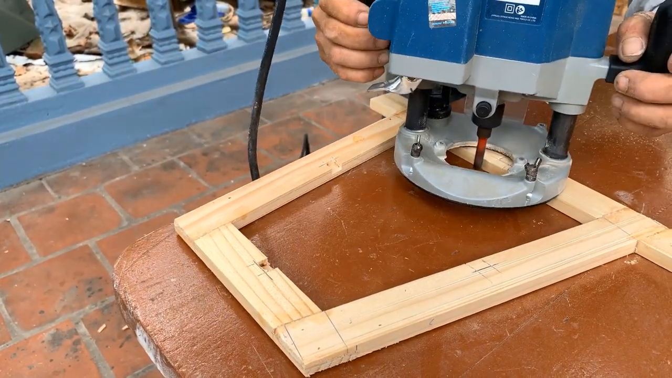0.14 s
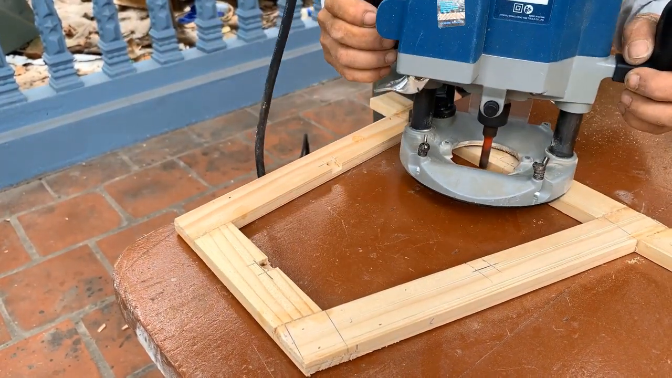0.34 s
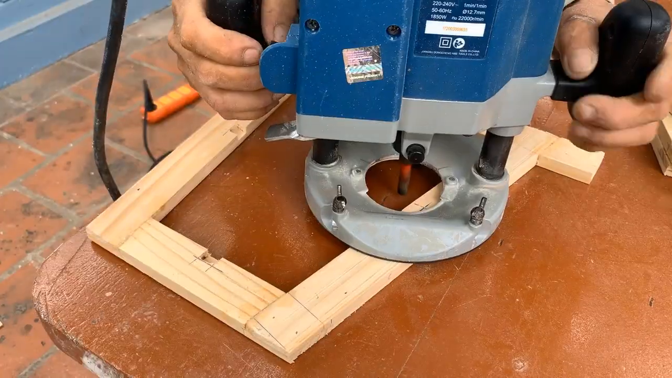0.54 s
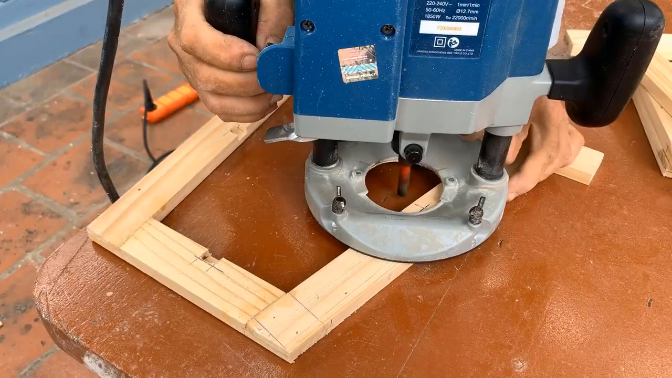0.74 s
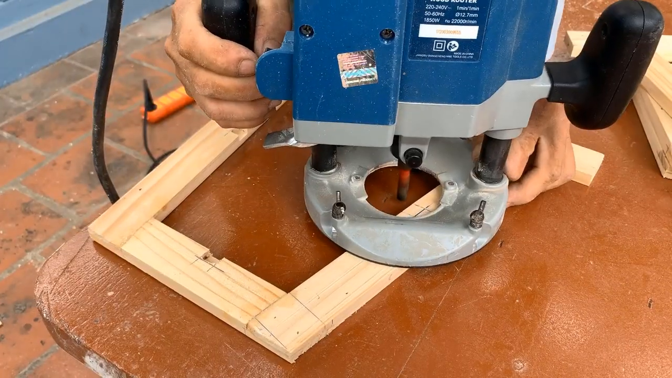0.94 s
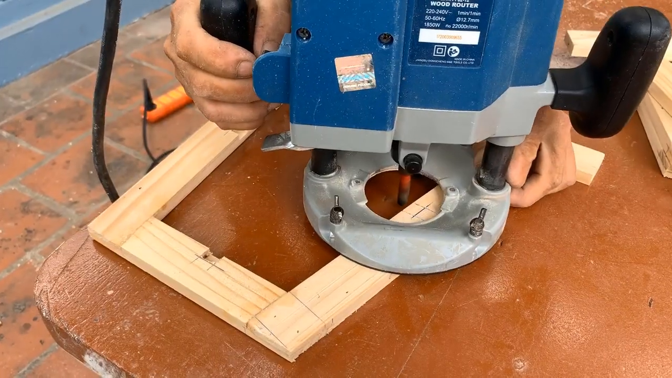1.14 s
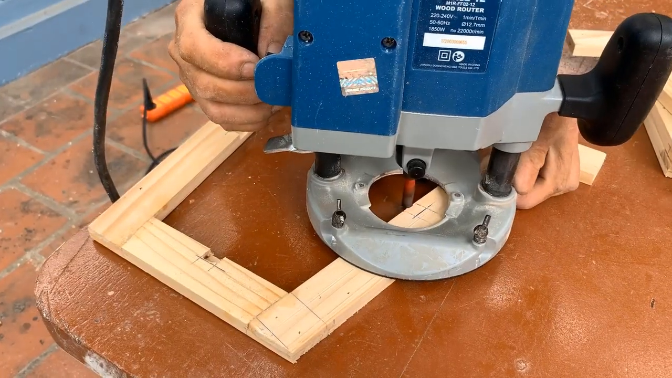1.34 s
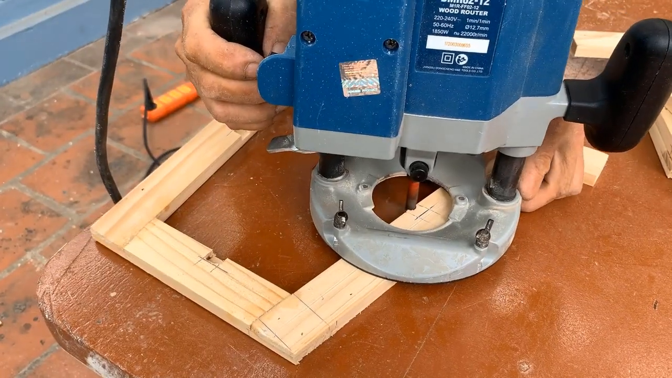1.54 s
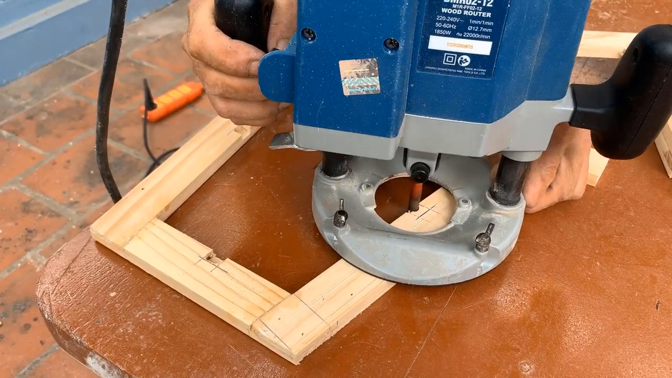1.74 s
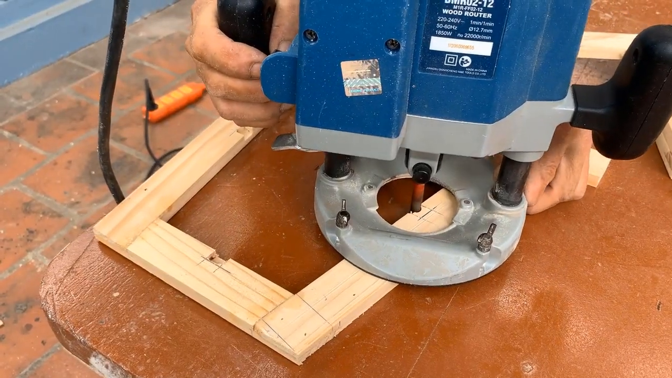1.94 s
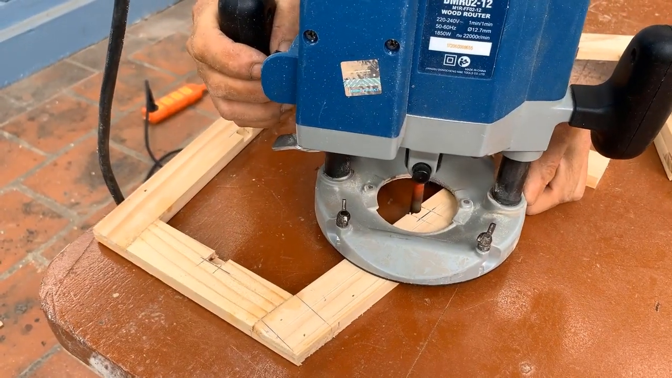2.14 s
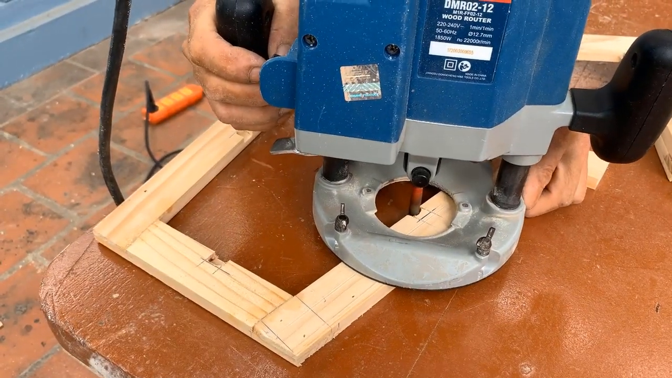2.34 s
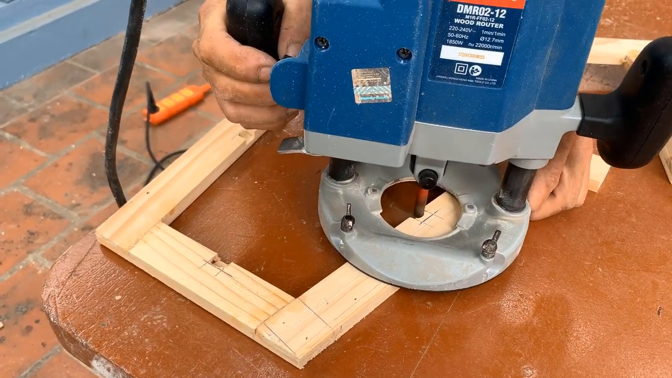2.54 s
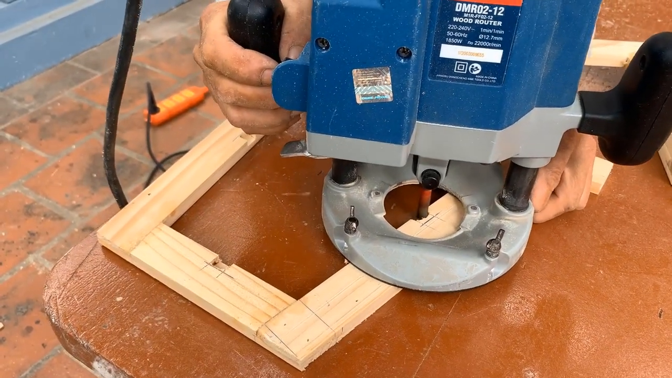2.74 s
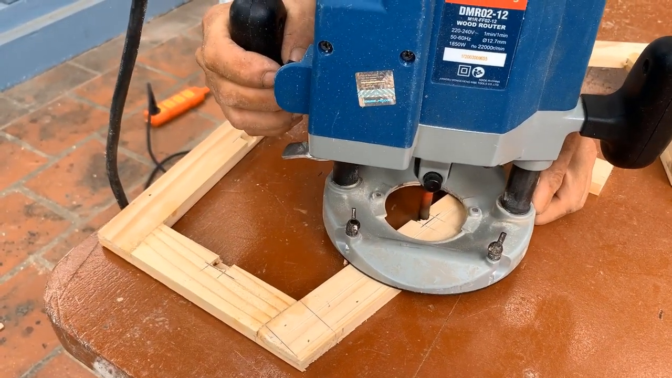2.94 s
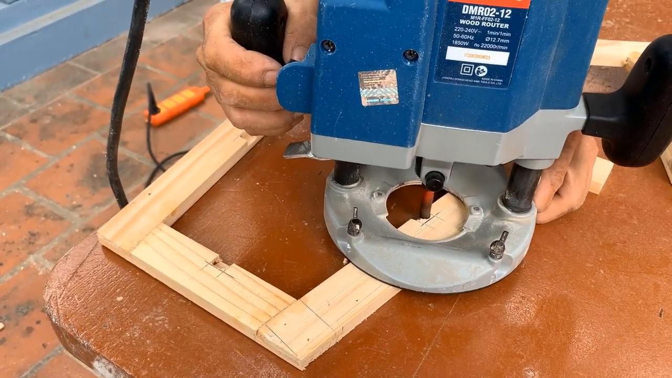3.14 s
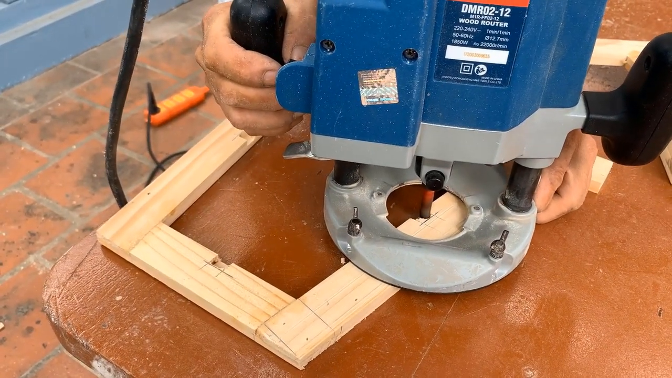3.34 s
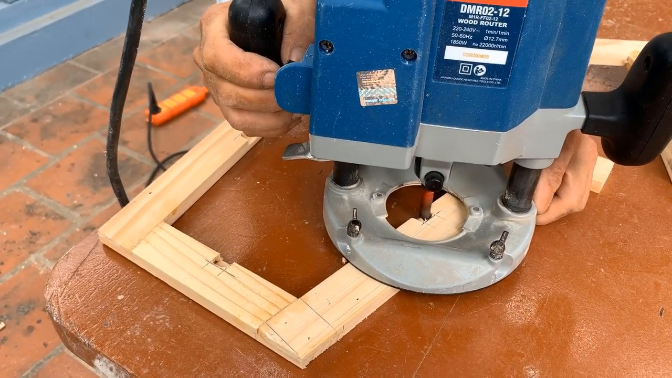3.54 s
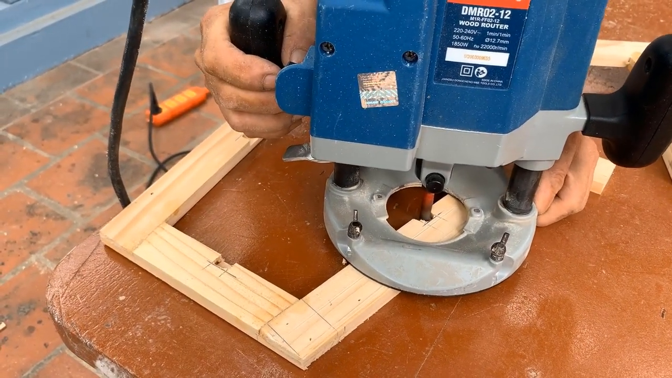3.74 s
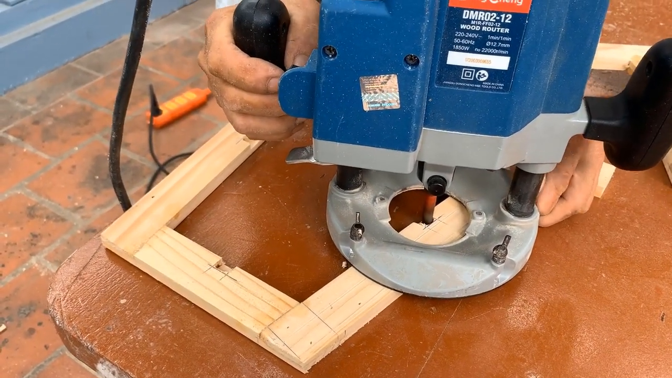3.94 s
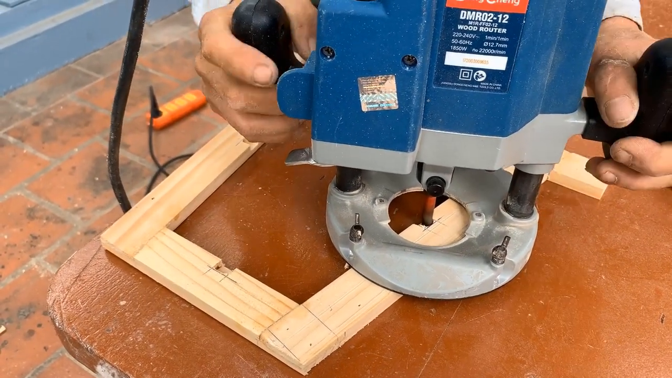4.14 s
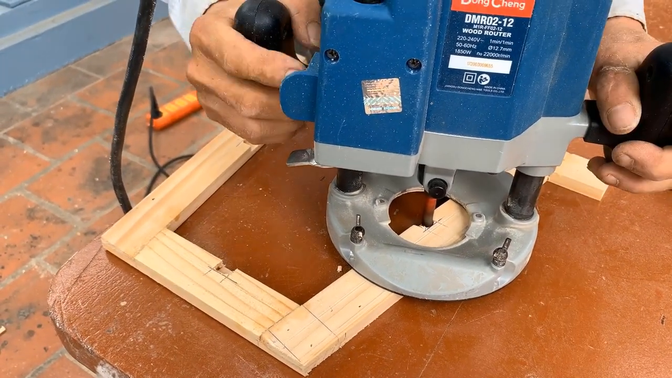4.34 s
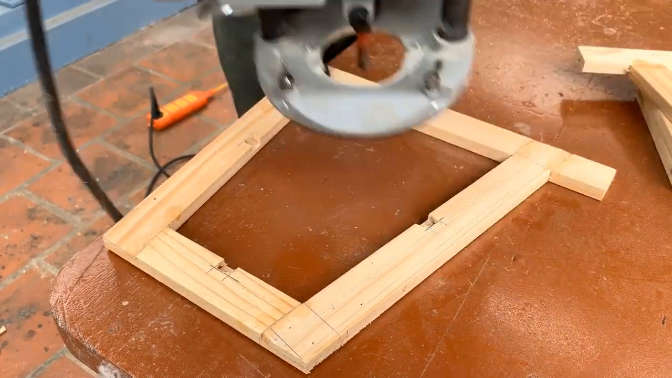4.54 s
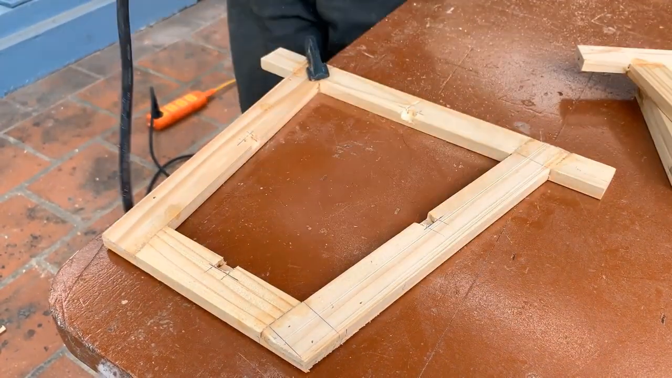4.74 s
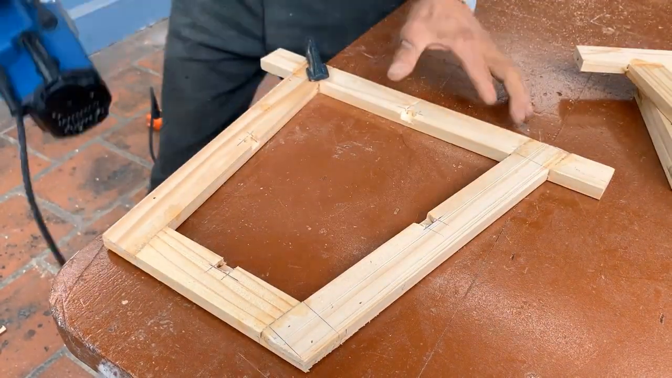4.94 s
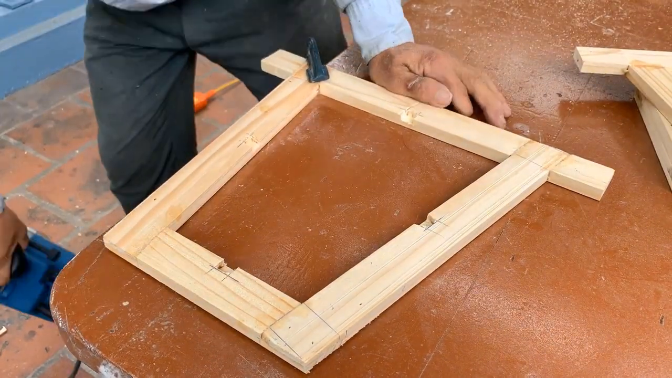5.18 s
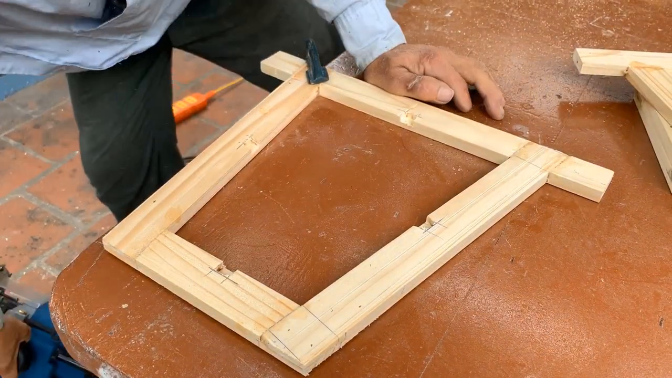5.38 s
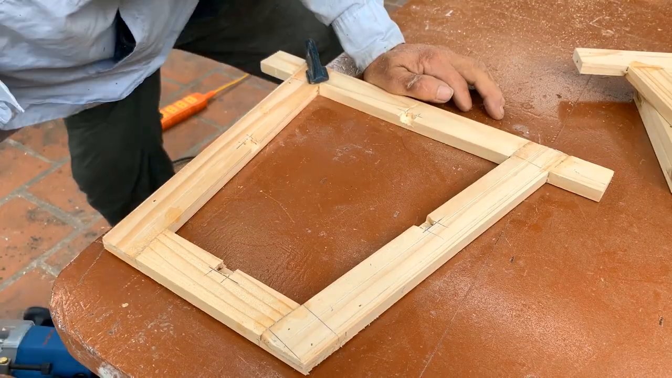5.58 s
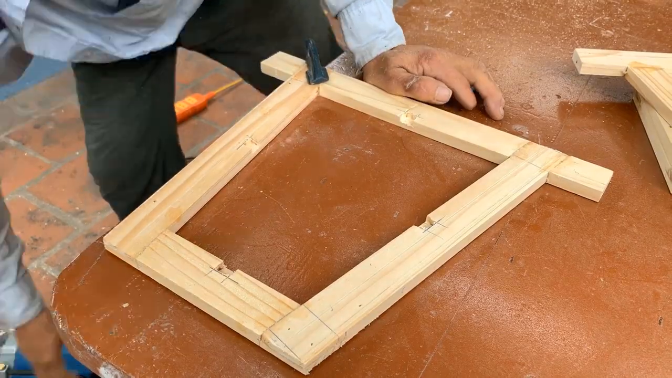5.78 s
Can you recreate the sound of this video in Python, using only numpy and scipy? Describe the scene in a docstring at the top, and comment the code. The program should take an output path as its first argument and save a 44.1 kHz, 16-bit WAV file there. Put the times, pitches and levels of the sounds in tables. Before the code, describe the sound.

A plunge router is already running at full speed, heard close in a quiet yard: a steady high motor whine around 900 Hz with overtones, inside a broad, bright rush of fan air. At about 0.53 s the whole sound drops out for a blink as the tool is seated, then resumes slightly lower and fuller. From 1.4 s the bit meets softwood: piercing, buzzy squeals come in short uneven pushes, the pitch sagging slightly under load, with the sharpest shriek near 2.7 s and lighter rubbing afterwards. Cutting ends just after 4 s, leaving free whine. At 4.4 s it is switched off and lifted; a hissing gust peaks near 4.65 s while whine and air slide down and fade. A thin, falling whistle remains around 5 s. Two soft, low bumps at 5.47 and 5.56 s and a brighter woody knock at 5.73 s set it down over faint outdoor hush.

```python
"""A plunge router held at full speed whines over the rush of its cooling fan; the whole sound drops out
briefly, then it runs seated on the wood. Pushed into a softwood frame to cut a notch, its two-flute bit squeals
in overtones locked to the spindle. Switched off, it is lifted away: exhaust gusts over the notch and the tones
fall as drag and friction slow it. A thin falling whistle is left, then two bumps and a knock of ringing modes
set it down in a quiet yard."""
import sys
import numpy as np
from scipy import signal
from scipy.fft import rfft, irfft, next_fast_len
from scipy.io import wavfile
from scipy.ndimage import uniform_filter1d, map_coordinates

SR = 44100
rng = np.random.default_rng(int(sys.argv[2]) if len(sys.argv) > 2 else 0)


def bounce(signal):
    """Save signal as a 16-bit WAV file at the path given by the first command-line argument."""
    frames = np.transpose(np.atleast_2d(signal))
    limited = np.clip(frames, -1, 1)
    pcm = np.round(limited * 32767).astype(np.int16)
    wavfile.write(sys.argv[1], SR, pcm)


N = 256215
TOUCH_S, CLEAR_S = 1.4, 4.07  # the bit starts to touch the wood, and starts to let go


def amp(db):
    """Decibels to linear gain."""
    return 10 ** (np.asarray(db) / 20)


def unit(x):
    """Scale to an rms of 1."""
    return x / np.sqrt(np.mean(x ** 2) + 1e-20)


def along(points, hz):
    """Read (frequency [Hz], value) points on a log frequency axis."""
    f, v = np.transpose(points)
    return np.interp(np.log(hz + 1), np.log(f + 1), v)


def curves(rows):
    """One value per sample for each column after the time."""
    s, *cols = np.transpose(rows)
    return [np.interp(np.arange(N) / SR, s, c) for c in cols]


def wobble(rate):
    """A smooth random curve with rate knots a second."""
    knots = rng.standard_normal(int(N * rate / SR) + 4)
    return map_coordinates(knots, [np.arange(N) * rate / SR])


def filtered(x, response):
    """Shape the spectrum of x by a response of frequency."""
    m = next_fast_len(N + SR // 4)
    return irfft(rfft(x, m) * response(np.fft.rfftfreq(m, 1 / SR)), m)[..., :N]


def swells(resonances, hz):
    """Gain in dB at a frequency from (centre [Hz], width [Hz], gain [dB]) resonances."""
    return sum(db / (1 + (2 * (hz - centre) / width) ** 2) for centre, width, db in resonances)


def rush(spectrum, resonances=(), patchy_db=1):
    """Turbulent stereo noise of rms 1, with patches of random gain in time and frequency."""
    # likeness of left and right: (frequency [Hz], correlation [0-1])
    likeness = [(150, .992), (300, .968), (650, .92), (1400, .66), (2500, .85), (5000, .36), (8000, .33),
                (14000, .42)]
    z = signal.stft(rng.standard_normal((2, N)), nperseg=512)[2]
    field = uniform_filter1d(rng.standard_normal(z.shape[1:]), size=5, axis=0)
    field = uniform_filter1d(field, size=14, axis=1)
    pair = signal.istft(z * amp(patchy_db * unit(field)), nperseg=512)[1][:, :N]

    def mid_side(hz):
        turn = np.arccos(np.clip(along(likeness, hz), 0, 1)) / 2
        colour = amp(along(spectrum, hz) + swells(resonances, hz))
        return colour * [np.cos(turn), np.sin(turn)]

    mid, side = filtered(pair, mid_side)
    return unit(np.array([mid + side, mid - side]))


def tone(turns, db, order, flutter_db, lead=0, blur=0.11):
    """A sine at order times the spindle rate, with fluttering level, blurred phase and a drifting stereo lead."""
    phase = 2 * np.pi * order * turns + blur * wobble(120)
    # the left channel runs ahead by about lead radians
    sides = np.array([[.5], [-.5]]) * (lead + 0.27 * wobble(4.86))
    flutter = amp(flutter_db * (.8 * wobble(45) + .6 * wobble(14)))
    audible = order * np.gradient(turns) < .5  # mute anything above half the sample rate
    return amp(db) * audible * unit(flutter * np.sin(phase + sides))


def gate(start, end):
    """Grip, hold and release of a contact between bit and wood."""
    grip_s, release_s = 0.009, 0.042
    t = np.arange(N) / SR
    return np.clip((t - start) / grip_s, 0, 1) * np.clip(1 - (t - end) / release_s, 0, 1)


def whereabouts():
    """Shares of the three places: held above the work, seated on it, carried away."""
    # where the machine is: (time [s], seated [0-1], carried away [0-1])
    place = [(.51, 0.08, 0), (.54, 0.97, 0), (4.42, 1, 0), (4.62, 0.8, 0.07), (4.78, 0.42, 0.58),
             (4.97, 0, 0.9), (5.1, 0, 1)]
    seated, away = np.clip(curves(place), 0, 1)
    shares = np.array([np.clip(1 - seated - away, 0, 1), seated, away])
    return shares / shares.sum(axis=0)


def spindle():
    """Turns per second: driven until the switch-off, then braked by air drag and bearing friction."""
    # speed under power, sagging under load: (time [s], speed [turns/s])
    powered = [(0.0, 443.8), (0.5, 444.2), (0.55, 441.1), (1.3, 440.9), (1.42, 441.7), (1.6, 438.0),
               (1.8, 431.2), (1.9, 430.1), (2.3, 433.6), (2.6, 437.2), (2.7, 433.3), (2.8, 431.8),
               (3.0, 432.9), (3.3, 431.0), (3.6, 431.5), (3.8, 433.5), (4.05, 438.5), (4.42, 441.7)]
    off_s, air_drag, friction = 4.424, .00091, 59  # s, per turn, turns/s lost each second
    driven, = curves(powered)
    coast_s = np.maximum(np.arange(N) / SR - off_s, 0)
    even = np.sqrt(friction / air_drag)  # the speed at which both brake equally
    return even * np.tan(np.arctan(driven / even) - air_drag * even * coast_s)


def yard():
    """The quiet yard: a faint bed of patchy, mostly low noise."""
    # colour of the yard: (frequency [Hz], relative density [dB])
    yard_colour = [(30, -35), (70, -9), (150, 3), (300, -4.5), (800, -4), (4000, -22), (15000, -25)]
    return amp(-78.5) * rush(yard_colour, patchy_db=4.0)


def knocks():
    """Each set-down contact is a short noise clack ringing the same modes; soft ones keep only the low end."""
    # contacts: (time [s], gain [dB], upper band edge [Hz])
    contacts = [(5.467, -58.5, 504), (5.564, -55, 472), (5.732, -50.5, 2500)]
    # ringing modes: (frequency [Hz], relative level [dB], t60 [s])
    modes = [(166, -7, 0.14), (243.7, -7, 0.071), (311.7, -8, 0.14), (465, -0.5, 0.044), (640, 2.5, 0.032),
             (977, -4, .035), (1510, -17, .05), (2080, -0.5, .03)]
    out, t = np.zeros(N + SR), np.arange(SR // 3) / SR
    for s, db, bright_hz in contacts:
        ring = 0
        for hz, mode_db, t60 in modes:
            ring = ring + amp(mode_db - 60 * t / t60) * np.sin(2 * np.pi * (hz * t + rng.random()))
        clack = amp(7.0 - 60 * t / 0.059) * rng.standard_normal(len(t))  # t60 of 59 ms
        softness = signal.butter(4, [130, bright_hz], "bandpass", fs=SR, output="sos")
        out[round(s * SR):][:len(t)] += amp(db) * signal.sosfilt(softness, ring + clack)
    return out[:N]


def sweep():
    """A short gust of exhaust hisses over the edges of the fresh notch as the machine lifts."""
    # gust: (time [s], level [dB])
    gust = [(4.4, -82), (4.55, -52.5), (4.65, -45.5), (4.73, -50.5), (4.9, -60.5), (5.1, -66)]
    # colour of the notch edges: (frequency [Hz], relative density [dB])
    notch = [(1800, -36), (2500, -7.5), (3100, -1), (3700, -4.5), (4400, 1), (6000, -7), (12000, -17)]
    gust_db, = curves(gust)
    return amp(gust_db) * rush(notch, patchy_db=4.5)


def rotor(turns):
    """As the air dies down, the slotted rotor is left whistling at 32 and 64 times the spindle rate."""
    # lower whistle: (time [s], level [dB])
    whistle_levels = [(4.85, -82), (4.96, -67), (5.1, -59), (5.2, -66), (5.35, -66), (5.81, -72)]
    whistle_db, = curves(whistle_levels)
    whistle = tone(turns, whistle_db, order=32, flutter_db=4, lead=1.1, blur=0.55)
    whistle += tone(turns, whistle_db + 7, order=64, flutter_db=3.5, lead=1.2, blur=.7)
    return whistle


def fan(speed, shares):
    """Vent air roars and hisses, dying down with the speed; its colour follows where the machine is held."""
    # air colour held above the work, seated and carried away: (frequency [Hz], relative density [dB])
    lifted = [(40, -56), (170, -18), (660, -10), (800, -5), (1460, 0), (1660, -6), (2590, -6), (3810, -6),
              (6430, -5.5), (6650, 0), (8010, 2.5), (9010, -4), (12360, -8), (15500, -3.5)]
    seated = [(40, -47.5), (140, -20), (330, -22.5), (770, -15.5), (1510, -5), (1850, -14), (3160, -9.5),
              (5900, -4.5), (7100, -1), (8290, -0.1), (8950, -4.5), (12260, -5), (13110, -1.5),
              (15500, -10.5)]
    carried = [(40, -38), (160, -14), (370, -23), (610, -13.5), (930, -16), (1380, -5.5), (1950, -9.5),
               (2420, -2.5), (3350, -8), (4410, 1.5), (6830, -5.5), (9350, -5), (12150, -7), (15500, -6.5)]
    # the table's echo thins one band while held above it: (centre [Hz], width [Hz], gain [dB])
    table_dip = [(2750, 200, -6)]
    # space between motor, base plate and wood: (centre [Hz], width [Hz], gain [dB])
    cavity = [(468, 300, 5), (1070, 74, 2), (1510, 140, 1.9), (2635, 350, 5), (4410, 460, 2.5),
              (5880, 190, 1.2), (6960, 430, 4.5)]
    # base levels at starting speed: (above the work [dB], seated [dB], carried away [dB])
    roar_levels = (-54.5, -54.5, -66)
    hiss_levels = (-40.5, -38.5, -47)
    # the air swells a little as the tool is worked: (time [s], gain [dB])
    air_swell = [(0, 1), (.7, -.5), (.9, .4), (1.03, -.6), (1.33, -0.4), (1.47, 1.3), (1.95, 0.5),
                 (2.15, .7), (2.5, 0.5), (2.95, 0.6), (3.35, 1.1), (3.6, 0.5), (4.2, 0), (4.35, .7),
                 (4.5, 0)]
    roar_power, hiss_power = .3, 2.11  # roar and hiss amplitude follow the speed to these powers
    speed_db = 20 * np.log10(speed / speed[0])
    swell_db, = curves(air_swell)
    roar_db = np.dot(roar_levels, shares) + roar_power * speed_db + swell_db
    hiss_db = np.dot(hiss_levels, shares) + hiss_power * speed_db + swell_db
    # carried away, the air reaches the left channel 0.12 ms before the right
    from_left = lambda hz: np.exp(np.array([[1j], [-1j]]) * np.pi * hz * 0.00012)
    airs = [rush(lifted, table_dip, patchy_db=1.5),
            rush(seated, cavity, patchy_db=1.27),
            filtered(rush(carried, patchy_db=2.5), from_left)]
    roar = hiss = 0
    for share, air in zip(shares, airs):
        low = filtered(air, lambda hz: hz < 2000)
        roar = roar + np.sqrt(share) * unit(low)
        hiss = hiss + np.sqrt(share) * unit(air - low)
    return amp(roar_db + 0.87 * wobble(16)) * roar + amp(hiss_db + 0.54 * wobble(28.1)) * hiss


def bit(turns, speed, shares):
    """Two flutes beat the air twice a turn; the falling tones swell as they pass the housing's resonances."""
    # flute tone before the housing's gain: (time [s], level [dB])
    flute = [(0, -64), (.5, -65.5), (.7, -61), (1.55, -59), (1.8, -61.5), (2.08, -55.5), (2.33, -61),
             (2.56, -57), (2.65, -65.5), (2.97, -59), (3.5, -55), (3.84, -57), (3.91, -64), (3.97, -56.5),
             (4.5, -57.5), (4.6, -66), (4.8, -79), (5.5, -82.5)]
    # housing resonances: (centre [Hz], width [Hz], gain [dB])
    housing = [(461, 16, 16), (625, 30, 13), (1310, 65, 8), (1450, 270, 13.5)]
    # octave before the housing's gain: (above the work [dB], seated [dB], carried away [dB])
    octave_levels = (-63, -69, -83)
    flute_db, = curves(flute)
    sound = tone(turns, flute_db + swells(housing, 2 * speed), order=2, flutter_db=1.3, lead=-.3)
    octave_db = np.dot(octave_levels, shares) + swells(housing, 4 * speed)
    free = 1 - gate(TOUCH_S, CLEAR_S)
    sound += free * tone(turns, octave_db, order=4, flutter_db=2, lead=-.8)
    sound += tone(turns, flute_db - 7.0, order=10, flutter_db=4.0)
    return sound


def cutting(turns):
    """Flutes strike the wood in step with the spindle; each push raises their overtones above light rubbing."""
    # light rubbing: (octave [dB], bite [dB], chatter [dB], squeal [dB], shriek [dB])
    rub = (-70.5, -61.5, -57, -56, -64)
    # pushes, with levels at mid-push for 2, 4, 6, 10 and 12 times the flute rate:
    # (time [s], length [s], octave [dB], bite [dB], chatter [dB], squeal [dB], shriek [dB],
    #  chatter's lead at left [rad])
    pushes = [(1.407, .05, -63, -46.5, -49, -47, -59, 1.4), (1.47, 0.13, -57.5, -54, -60, -45.5, -56, 3.3),
              (1.61, 0.17, -51, -49.5, -45.5, -46, -57, 4.7), (1.78, .08, -56, -52.5, -52, -46.5, -65, 2.8),
              (2.14, 0.16, -73, -54.5, -47, -45, -61, 3.5), (2.402, 0.065, -61, -56.5, -49, -53, -60, 3.5),
              (2.566, .05, -70, -54, -53, -47, -60, 3.3), (2.63, 0.048, -64, -48.5, -44, -43.5, -67, 4.3),
              (2.685, 0.048, -52, -46, -39.5, -42.5, -47, 4.3),
              (2.75, 0.22, -61, -52.5, -53, -48.5, -55, 3.4),
              (2.937, .15, -56.5, -48.5, -54, -61, -50.5, 3.7), (3.12, .19, -59, -56.5, -57, -57, -65, 3.8),
              (3.312, 0.21, -62, -53, -59, -57, -61, 4.8), (3.537, .09, -60, -60, -62, -58, -47, .4),
              (3.888, .05, -71, -60, -47, -46, -57, 2.6), (3.98, .07, -69, -65, -55, -58, -58, 2.7)]
    # the bit catches and one more overtone rings:
    # (time [s], half length [s], multiple of the flute rate, level [dB])
    catches = [(1.428, 0.026, 3, -52), (2.1, 0.32, 5, -62), (2.665, 0.024, 3, -51.5),
               (2.695, 0.047, 5, -47), (3.547, .06, 5, -62)]
    ease_db_per_s = 12  # a push eases as the wood gives way
    t = np.arange(N) / SR
    level = amp(rub)[:, None] * np.ones(N)
    for s, length, *overtones_db, _ in pushes:
        from_middle_s = np.clip(t - s - length / 2, -length, length)
        push = gate(s, s + length) * amp(-ease_db_per_s * from_middle_s)
        level = np.maximum(level, amp(overtones_db)[:, None] * push)
    octave_db, bite_db, chatter_db, squeal_db, shriek_db = 20 * np.log10(level)
    chatter_lead, = curves([(s + length / 2, lead) for s, length, *_, lead in pushes])
    sound = tone(turns, octave_db, order=4, flutter_db=2.6, lead=-1.03)
    sound += tone(turns, bite_db, order=8, flutter_db=2.0, lead=0.45)
    sound += tone(turns, chatter_db, order=12, flutter_db=2.5, lead=chatter_lead)
    sound += tone(turns, squeal_db, order=20, flutter_db=2.7)
    sound += tone(turns, squeal_db - 7, order=16, flutter_db=4, lead=0.59)
    sound += tone(turns, squeal_db - 12, order=28, flutter_db=4, lead=-.8)
    sound += tone(turns, shriek_db, order=24, flutter_db=2, lead=-1.3)
    for s, half_length, multiple, db in catches:
        swell = np.exp(-((t - s) / half_length) ** 4)
        sound += swell * tone(turns, db, order=2 * multiple, flutter_db=2.5)
    return gate(TOUCH_S, CLEAR_S) * sound


def scene():
    """One spindle drives the air and every tone; the whole level dips briefly near the start."""
    # brief dip of the whole sound: (time [s], gain [dB])
    dip = [(.514, 0), (.516, -15), (.523, -26), (.527, -45), (.532, -34), (.535, -14), (.538, 0)]
    speed, shares = spindle(), whereabouts()
    turns = np.cumsum(speed * (1 + .0004 * wobble(18))) / SR  # with slight random speed jitter
    router = fan(speed, shares) + bit(turns, speed, shares) + cutting(turns) + rotor(turns) + sweep()
    sound = router + knocks() + yard()
    dip_db, = curves(dip)
    return sound * amp(dip_db)


def record(dry):
    """Left and right differ a little in colour and keep nothing above the band limit."""
    # left over right: (frequency [Hz], level difference [dB])
    balance = [(400, 0), (700, .5), (1300, -1.3), (2400, -.2), (4400, 1.3), (8100, -.6), (15000, -3.6)]
    top_hz = 15720
    sides = np.array([[.5], [-.5]])
    return filtered(dry, lambda hz: amp(sides * along(balance, hz)) * (hz < top_hz))


dry = scene()
out = record(dry)
bounce(out)
```